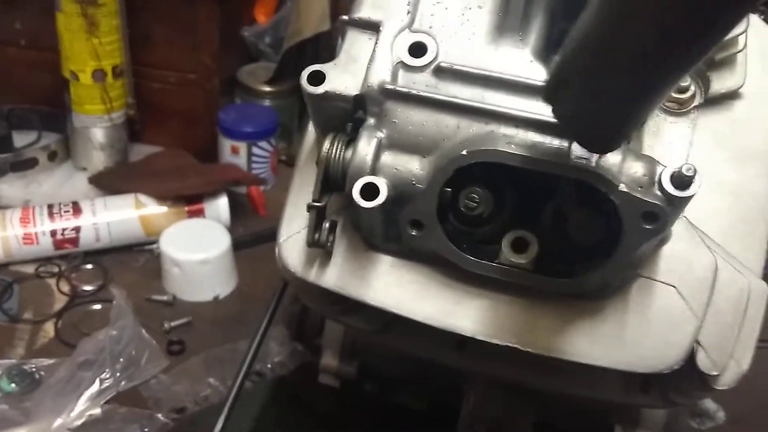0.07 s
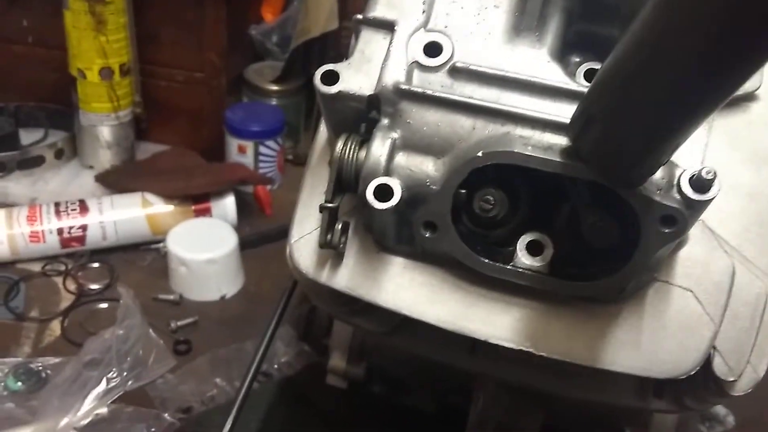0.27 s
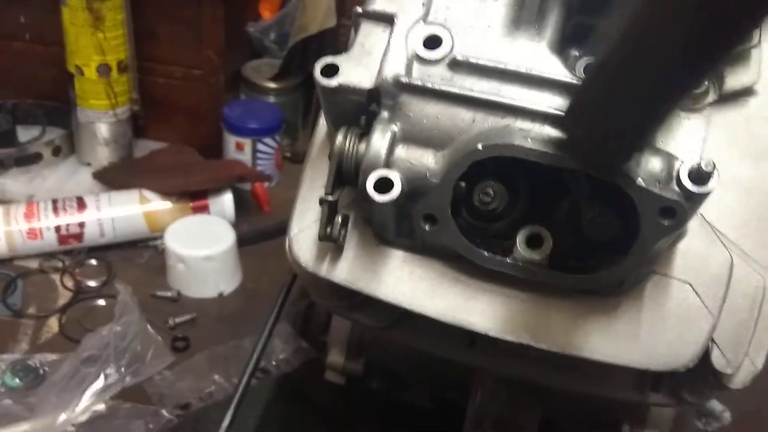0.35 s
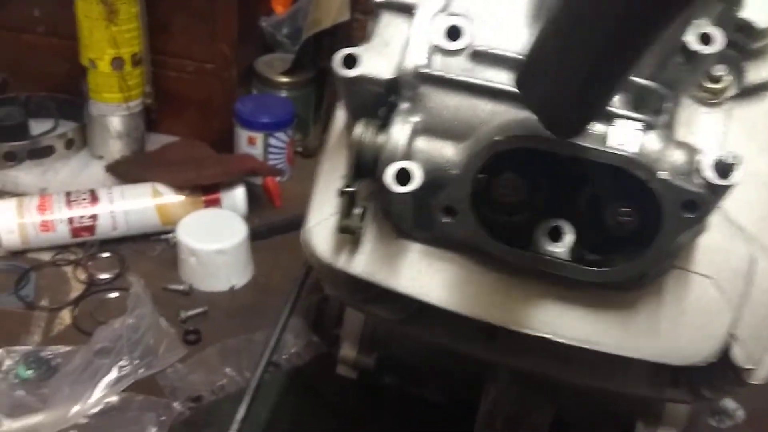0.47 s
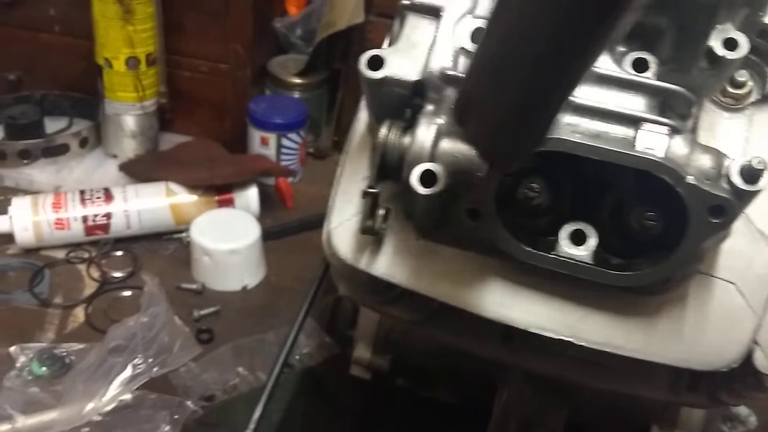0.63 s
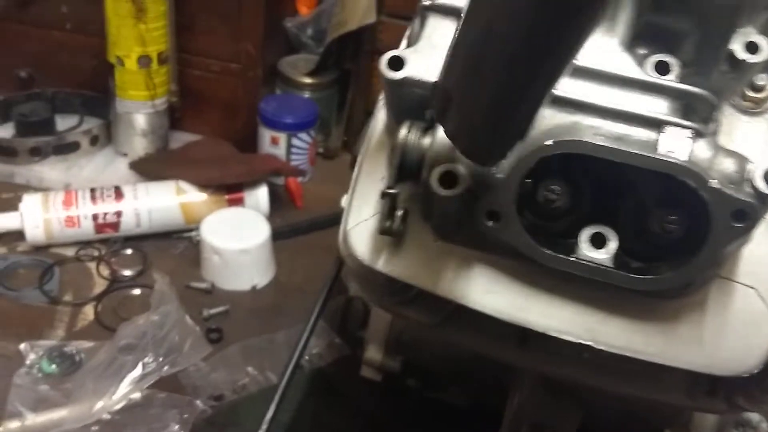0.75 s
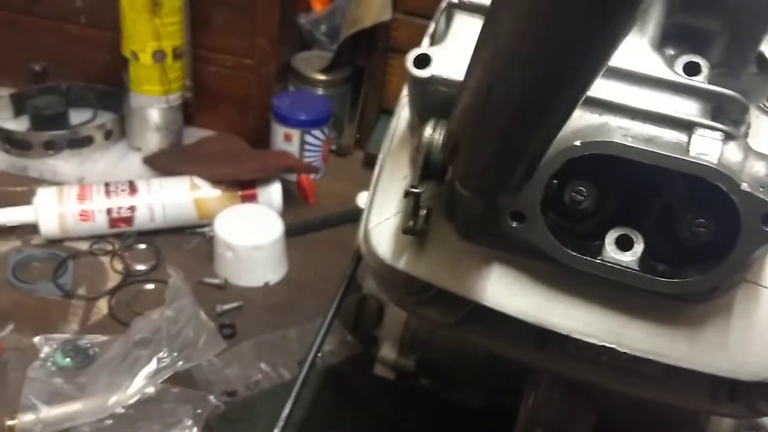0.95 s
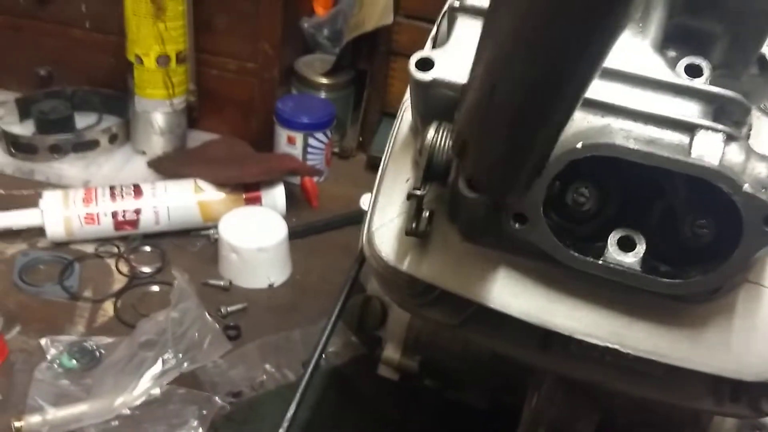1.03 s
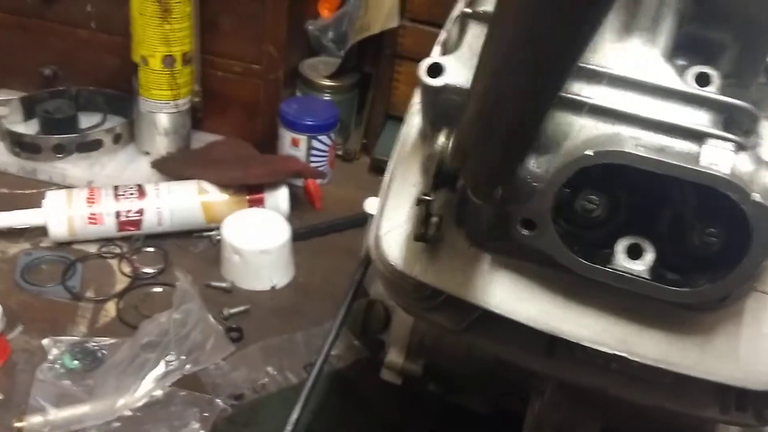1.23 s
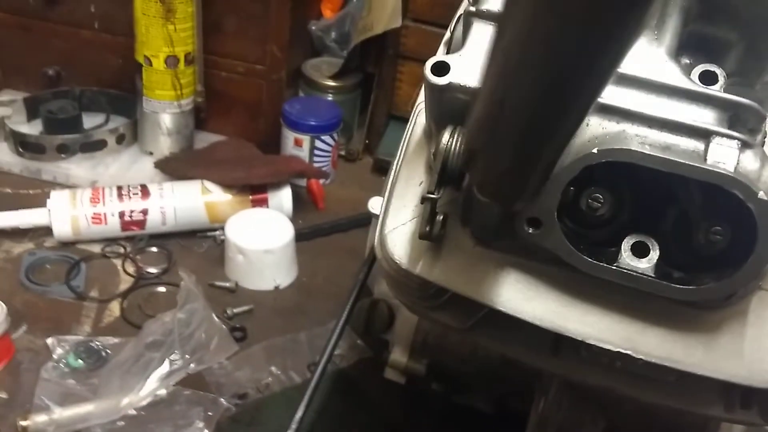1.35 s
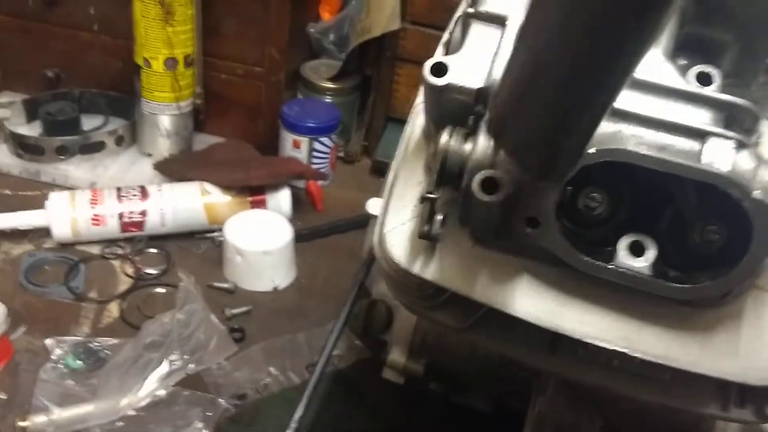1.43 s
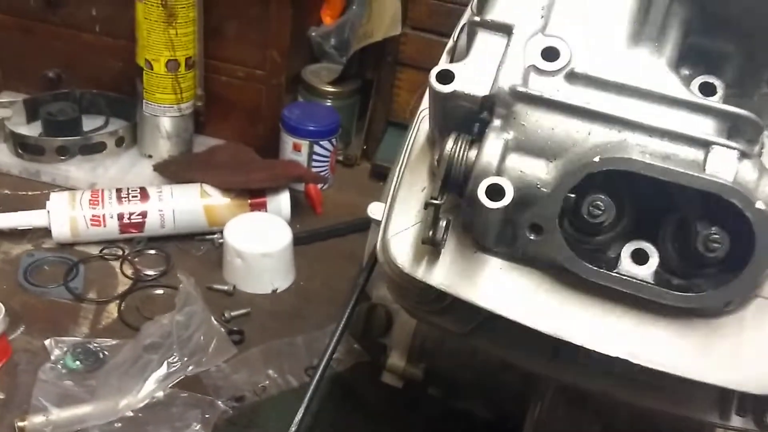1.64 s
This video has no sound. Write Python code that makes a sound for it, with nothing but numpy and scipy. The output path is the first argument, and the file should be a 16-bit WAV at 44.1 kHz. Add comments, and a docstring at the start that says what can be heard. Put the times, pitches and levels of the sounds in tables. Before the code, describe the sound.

A tool handle knocks sharply three times on a metal engine casing, shaking the wooden bench

```python
"""Room air, a wavering hum and faint handling knocks lead to three taps of a tool handle on a cast engine
cover on a wooden bench in a small garage. An insect trills between the first and second taps; knocks go on
to the end. Decaying modes make the blows, casting and bench; shaped noise makes cracks, grit, air and room tail.
Each tap shakes the bench, which rebounds once. Two close microphones are mixed through a short delay."""
import sys
import numpy as np
from scipy import signal
from scipy.fft import rfft, irfft, next_fast_len
from scipy.io import wavfile
from scipy.ndimage import uniform_filter1d, map_coordinates

SR = 44100
rng = np.random.default_rng(int(sys.argv[2]) if len(sys.argv) > 2 else 0)


def master_out(mix):
    """Clip the mix to full scale and print it as 16-bit PCM to the path in sys.argv[1]."""
    frames = np.transpose(np.atleast_2d(mix))
    ceiling = np.clip(frames, -1, 1)
    pcm = np.round(ceiling * 32767).astype(np.int16)
    wavfile.write(sys.argv[1], SR, pcm)


N = 74970  # length in samples


def amp(db):
    """Logarithmic level: decibels become an amplitude gain."""
    return 10 ** (np.asarray(db) / 20)


def unit(x):
    """Power normalisation: scales to an rms of 1."""
    return x / np.sqrt(np.mean(x ** 2) + 1e-20)


def along(points, hz):
    """Logarithmic frequency scale: interpolates (frequency, value) points along it."""
    point_hz, value = np.transpose(points)
    return np.interp(np.log(hz + 1), np.log(point_hz + 1), value)


def curves(rows):
    """Linear interpolation in time: one value per sample for each column after the first."""
    start_s, *columns = np.transpose(rows)
    return [np.interp(np.arange(N) / SR, start_s, column) for column in columns]


def wobble(rate):
    """Slow random modulation: a smooth curve through rate random knots a second."""
    knots = rng.standard_normal(int(N * rate / SR) + 4)
    return map_coordinates(knots, [np.arange(N) * rate / SR])


def filtered(x, response):
    """Linear filtering: multiplies the spectrum by a response of frequency."""
    n = x.shape[-1]
    m = next_fast_len(n + 4096)
    return irfft(rfft(x, m) * response(np.fft.rfftfreq(m, 1 / SR)), m)[..., :n]


def noise(t, response):
    """Subtractive synthesis: two independent rows of white noise, filtered, at a joint rms of 1."""
    return unit(filtered(rng.standard_normal((2, len(t))), response))


def add(track, s, sound):
    """Superposition: mixes a sound in at time s."""
    part = track[..., max(round(s * SR), 0):][..., :sound.shape[-1]]
    part += sound[..., :part.shape[-1]]


RATTLE_DB, RATTLE_PER_S = 2.5, 110  # flutter from loose contact: depth, random knots a second


def ring(modes, t, scatter_db, rise_cycles=0.0074):
    """Modal decay with random levels; row 0 is common to both sides, row 1 differs by random phases."""
    hz, level_db, t60_s = np.transpose(modes)[..., None]
    luck, phase = rng.standard_normal((2, len(modes), 1))
    fade = amp(level_db + scatter_db * luck - 60 * t / t60_s)
    fade = fade * (1 - np.exp(-(t * hz / rise_cycles) ** 2))
    knots = rng.standard_normal((len(modes), int(t[-1] * RATTLE_PER_S) + 2))
    knots[:, 0] = 0
    flutter = [np.interp(t * RATTLE_PER_S, np.arange(len(row)), row) for row in knots]
    fade = fade * amp(RATTLE_DB * np.array(flutter))
    common = fade * np.sin(2 * np.pi * hz * t)
    differing = fade * np.sin(2 * np.pi * hz * t + 2 * np.pi * phase)
    return np.array([common.sum(0), differing.sum(0)])


# Base levels of the air noise before lift and waver: start_s [s], low_db [dB], treble_db [dB]
AIR_LEVELS = [(0.0, -49, -65), (0.42, -51.5, -67.5), (0.61, -51, -63.5), (0.766, -51.5, -64),
              (0.966, -48.5, -63.5), (1.198, -49.5, -62), (1.244, -50.5, -64.5), (1.33, -50.5, -62.5),
              (1.406, -58, -75.5), (1.7, -59.5, -68.5)]
# Spectra of the low and treble bands: frequency_hz [Hz], relative_db [dB per Hz]
AIR_LOW = [(25, 3), (45, 7), (70, 18.5), (120, 5.5), (270, 6), (400, -4.5), (800, -9.5), (1500, -15.5),
           (2200, -19), (2800, -33), (4000, -86)]
AIR_TREBLE = [(1200, -91.5), (2000, -36), (2800, 3.5), (4000, -2.5), (5000, 1), (6500, -2.5), (8000, -10),
              (11500, -10.5), (13900, -17.5), (14400, -52), (15400, -63)]
WAVER_DB = 1.2


def room_air():
    """Nonstationary band noise: two spectra whose strength is patchy in time and frequency."""
    low_db, treble_db = curves(AIR_LEVELS)
    out = np.zeros((2, N))
    for level_db, spectrum, lift_db in (low_db, AIR_LOW, 6), (treble_db, AIR_TREBLE, 2.5):
        z = signal.stft(rng.standard_normal((2, N)), nperseg=512)[2]
        patches = rng.standard_normal(z.shape[1:])
        patches = uniform_filter1d(patches, 6, 0)  # smooth over frequency
        patches = uniform_filter1d(patches, 8, 1)  # smooth over time
        patchy = signal.istft(z * amp(2.3 * unit(patches)), nperseg=512)[1][:, :N]
        band = unit(filtered(patchy, lambda f: amp(along(spectrum, f))))
        out += amp(level_db + lift_db + WAVER_DB * wobble(20)) * band
    return out


# Path of the hum before its waver: start_s [s], pitch_hz [Hz], level_db [dB]
HUM_PATH = [(0, 262, -45.5), (.2, 266, -50.5), (.45, 264, -57.5), (.6, 268, -50.5), (.85, 266, -48),
            (.92, 270, -61), (1.12, 271, -46), (1.3, 270, -59.5), (1.42, 275, -57), (1.7, 270, -63.5)]
HUM_WAVER_DB, HUM_WAVER_HZ = 2.5, 8


def hum():
    """Frequency and amplitude modulation: a sine whose pitch and level waver at random."""
    pitch_hz, level_db = curves(HUM_PATH)
    level = amp(level_db + HUM_WAVER_DB * wobble(26))
    phase = 2 * np.pi * np.cumsum(pitch_hz + HUM_WAVER_HZ * wobble(44)) / SR
    return level * np.sin(phase) * [[1], [.3]]


# Chirps of the trill: start_s [s], level_db [dB], pitch_hz [Hz, at the middle of the glide]
INSECT_CHIRPS = [(0.593, -55, 3920), (0.6298, -52.5, 4010), (0.6722, -56, 3877), (0.7087, -54, 3828),
                 (0.748, -53, 3910), (0.789, -55, 4023), (0.831, -53.5, 4130), (0.87, -59.5, 3770)]
CHIRP_S, CHIRP_GLIDE = .012, 0.15  # length; rise as a share of the pitch
TICK_DB, TICK_HZ, TICK_SPREAD = -6, 5000, .3  # scratch in each chirp; spread in log frequency


def insect():
    """Linear frequency sweep: short rising tones, roughened by random steps and a scratch of noise."""
    out, t = np.zeros((2, N)), np.arange(round(CHIRP_S * SR)) / SR
    for start_s, level_db, pitch_hz in INSECT_CHIRPS:
        tone = np.sin(2 * np.pi * pitch_hz * t * (1 + CHIRP_GLIDE * (t / CHIRP_S - 1) / 2))
        steps = rng.standard_normal((2, 30)).repeat(40, 1)[:, :len(t)]
        rasp = 1 + .7 * steps
        tick = noise(t, lambda f: np.exp(-(np.log((f + 1) / TICK_HZ) / TICK_SPREAD) ** 2))
        chirp = tone * rasp * [[1], [.5]] + amp(TICK_DB) * tick
        add(out, start_s, amp(level_db) * np.hanning(len(t)) * chirp)
    return out


# Faint knocks: start_s [s], level_db [dB], pitch_hz [Hz], t60_s [s], noise_share [ratio], rise_s [s]
HANDLING_KNOCKS = [(.006, -38, 230, 0.12, 0.23, 0.0034), (.066, -41.5, 1166, 0.14, 0.38, 0.0094),
                   (0.803, -53.5, 1702, 0.076, 2.9, 0.0057), (0.926, -50, 1740, 0.045, 2.3, 0.0027),
                   (1.091, -55.5, 1600, 0.058, 3.6, .005), (1.129, -29.5, 581, 0.022, 0.18, 0.00085),
                   (1.1293, -30.5, 428.6, 0.027, .2, 0.0015), (1.664, -60.5, 1657, 0.078, 0.81, .005)]


def handling():
    """Damped resonance with broadband contact noise: things set down or touched ring dully and puff."""
    out, t = np.zeros((2, N)), np.arange(SR // 6) / SR
    for start_s, level_db, pitch_hz, t60_s, noise_share, rise_s in HANDLING_KNOCKS:
        puff = noise(t, lambda f: f / (f + 0.5 * pitch_hz) / (1 + (f / (2.2 * pitch_hz)) ** 4))
        puff = noise_share * puff * amp(-60 * t / t60_s)
        rise = 1 - np.exp(-(t / rise_s) ** 2)
        add(out, start_s, amp(level_db) * rise * (ring([(pitch_hz, 0, t60_s)], t, 0.4) + puff))
    return out


# Decay of the room: frequency_hz [Hz], t60_s [s]
ROOM_DECAY = [(100, 0.47), (500, 0.17), (1500, 0.18), (4000, 0.17), (12000, 0.14)]
# Colour of the room: frequency_hz [Hz], relative_db [dB]
ROOM_COLOUR = [(60, -7.5), (300, -6), (1000, -13.5), (2000, -7), (4000, 1.5), (12000, -1.5)]


def garage(x):
    """Reverberation: convolution of the common row with noise whose frequencies die at their own speeds."""
    hz, t, z = signal.stft(rng.standard_normal((2, SR // 3)), SR, nperseg=256)
    fade_db = along(ROOM_COLOUR, hz)[:, None] - 60 * t / along(ROOM_DECAY, hz)[:, None]
    tail = signal.istft(z * amp(fade_db), SR, nperseg=256)[1]
    late = np.pad(x[:1], ((0, 0), (130, 0)))  # delay in samples before the tail
    return signal.fftconvolve(late, tail / np.linalg.norm(tail[0]), axes=1)


GRIT_T60_S, GRIT_HZ = 0.08, 5850  # decay; lower band edge


def grit(t):
    """Random amplitude modulation: loose small parts jingle as flickering, dying treble noise."""
    flicker = rng.standard_normal((2, len(t))) * amp(5 * wobble(600)[:len(t)])
    band = unit(filtered(flicker, lambda f: (f > GRIT_HZ) & (f < 14200)))
    return amp(-60 * t / GRIT_T60_S) * band


# Modes of the bench top: frequency_hz [Hz], level_db [dB], t60_s [s]
BENCH_TOP = [(356.5, 5, 0.051), (411.6, 9, 0.057), (454, 10, 0.04)]
# Low modes of the bench frame: frequency_hz [Hz], level_db [dB], t60_s [s]
BENCH_FRAME = [(96.65, -5.5, 0.023), (153, 10, 0.19), (214, 0, 0.22), (275.4, 4, 0.14)]
SPOT_DB = 1.5  # scatter of each mode with the spot struck
SWAY_RISE_CYCLES = 0.53
THUMP_HZ, THUMP_DB, THUMP_S = 69.2, 4, .025  # heave of the legs; time to the top of its envelope
REBOUND_S, REBOUND_HZ, REBOUND_T60_S = .036, 435, .06  # delay after the blow, pitch, decay
REBOUND_DB, REBOUND_RISE_CYCLES = 2, 3.5  # level over the bench top; rise


def bench(out, s, top_db, frame_db, t):
    """Structural vibration: legs heave once, top and frame modes ring, and the bench rebounds once."""
    envelope = (t / THUMP_S * np.exp(1 - t / THUMP_S)) ** 2
    heave = envelope * np.sin(2 * np.pi * THUMP_HZ * t + [[0], [1.5]])
    add(out, s, amp((top_db + frame_db) / 2 + THUMP_DB) * heave)
    add(out, s, amp(frame_db) * ring(BENCH_FRAME, t, SPOT_DB, SWAY_RISE_CYCLES))
    add(out, s, amp(top_db) * ring(BENCH_TOP, t, SPOT_DB, SWAY_RISE_CYCLES))
    rebound = ring([(REBOUND_HZ, 0, REBOUND_T60_S)], t, 2.2, REBOUND_RISE_CYCLES)
    add(out, s + REBOUND_S, amp(top_db + REBOUND_DB) * rebound)


# Spectrum of the crack: frequency_hz [Hz], relative_db [dB]
CRACK_COLOUR = [(1800, 1.5), (2600, 4.5), (3800, -1), (5000, -4), (6500, -13.5), (9000, -26.5),
                (14000, -37.5), (15400, -52.5)]
CRACK_T60_S = 0.017


def crack(t):
    """Impulsive broadband radiation: a sharp burst of noise above 1500 Hz."""
    snap = noise(t, lambda f: amp(along(CRACK_COLOUR, f)) * (f > 1500))
    return amp(-60 * t / CRACK_T60_S) * snap


KNOCK_RISE_S = 0.00053


def handle(pitch_hz, t60_s, t):
    """Single-mode resonance: the struck handle thuds at one damped pitch."""
    return ring([(pitch_hz, 0, t60_s)], t, 0) * (1 - np.exp(-(t / KNOCK_RISE_S) ** 2))


# Modes of the cast cover: frequency_hz [Hz], level_db [dB], t60_s [s]
CASTING_MODES = [(552.5, 3, 0.04), (680, -1, 0.039), (770, -8.5, 0.019), (923, -3.5, 0.067),
                 (1127, 3, 0.036), (1303.6, -1, 0.031), (1428.6, -3.5, .045), (1673, 0, 0.025),
                 (1759, -2.5, 0.027), (1870, -27, 0.062)]
# Spectrum of its many small modes: frequency_hz [Hz], relative_db [dB]
THUD_COLOUR = [(60, -32.5), (150, -4), (450, 5.5), (1000, -0.5), (1800, -10.5), (2300, -26), (4000, -65.5)]
THUD_DB, THUD_T60_S = -2, .1  # level before the shared casting gain; decay


def casting(t):
    """Modal density: a few modes ring distinctly while many small ones blur into dying noise."""
    thud = noise(t, lambda f: amp(along(THUD_COLOUR, f)))
    thud = amp(THUD_DB - 60 * t / THUD_T60_S) * (1 - np.exp(-t / KNOCK_RISE_S)) * thud
    return ring(CASTING_MODES, t, SPOT_DB, rise_cycles=0.34) + thud


# The blows: start_s [s], handle_db [dB], pitch_hz [Hz, handle], t60_s [s, handle], casting_db [dB],
# bench_top_db [dB], bench_frame_db [dB], crack_db [dB], room_db [dB], contact_s [s], grit_db [dB]
BLOWS = [(0.2097, -1.5, 1000, 0.023, -12.5, -22, -22.5, -22.5, -9, 0.00029, -52.5),
         (0.9753, -4.5, 1090, 0.018, -17, -19, -21.5, -32, -2.5, 0.00041, -60),
         (1.302, 6.5, 1492, 0.0083, -18, -22.5, -31.5, -21, -14, 0.00041, -56)]


def taps():
    """Impact excitation: a half-sine contact force drives handle and casting; longer contact dulls them."""
    out, t = np.zeros((2, N)), np.arange(SR // 3) / SR
    for (start_s, handle_db, pitch_hz, t60_s, casting_db, top_db, frame_db,
         crack_db, room_db, contact_s, grit_db) in BLOWS:
        push = np.sin(np.pi * np.clip(t[:60] / contact_s, 0, 1))
        body = amp(handle_db) * handle(pitch_hz, t60_s, t) + amp(casting_db) * casting(t)
        body = signal.fftconvolve(body, push[None] / push.sum(), axes=1)[:, :len(t)]
        body += amp(crack_db) * crack(t)
        add(out, start_s, body)
        add(out, start_s, amp(room_db) * garage(body))
        add(out, start_s, amp(grit_db) * grit(t))
        bench(out, start_s, top_db, frame_db, t)
    return out


def scene():
    """Superposition of sources: row 0 reaches both microphones alike, row 1 differs between them."""
    return room_air() + hum() + insect() + handling() + taps()


# Differing sound that fills the notches: frequency_hz [Hz], share [ratio]
NOTCH_LEAK = [(60, 0.039), (2500, 0.034), (5000, 0.16), (8000, 0.57), (13000, 0.35)]
# Common sound sent to the sides: frequency_hz [Hz], share [ratio]
SIDE_WIDTH = [(50, .2), (90, .3), (170, .12), (270, .06), (450, .25), (700, .2), (1600, .6), (2500, 1.1),
              (5000, .8), (12000, .8)]
# Differing sound, heard on both sides in opposite sense: frequency_hz [Hz], share [ratio]
SIDE_APART = [(60, 1), (200, .6), (300, .35), (500, .35), (800, .13), (1300, .1), (2500, .2), (4000, .35),
              (8000, .75)]
MIX_DELAY_S, LOW_CUT_HZ, TOP_HZ = 0.0003872, 5.4, 15500
LEFT_DB, CEILING = .6, 1  # left raised and right lowered by this much; clipping level


def record(dry):
    """Comb filtering: subtracting a delayed copy notches the mid signal at multiples of one over the delay."""
    late = lambda f: np.exp(-2j * np.pi * f * MIX_DELAY_S)
    share = lambda points, f: np.clip(along(points, f), 0, 2)
    mid = filtered(dry[0], lambda f: (1 - late(f)) / 2)
    mid += filtered(dry[1], lambda f: 1j * share(NOTCH_LEAK, f))
    # the sides keep the common bands that the mid signal loses
    side = filtered(dry[0], lambda f: share(SIDE_WIDTH, f) * (1 + late(f)) / 2)
    side += filtered(dry[1], lambda f: share(SIDE_APART, f) * (1 - late(f)) / 2)
    pair = np.array([mid + side, mid - side]) * amp([[LEFT_DB], [-LEFT_DB]])
    pair = filtered(pair, lambda f: (1j * f / (LOW_CUT_HZ + 1j * f)) ** 2)
    return filtered(np.clip(pair, -CEILING, CEILING), lambda f: f < TOP_HZ)


dry = scene()
out = record(dry)
master_out(out)
```